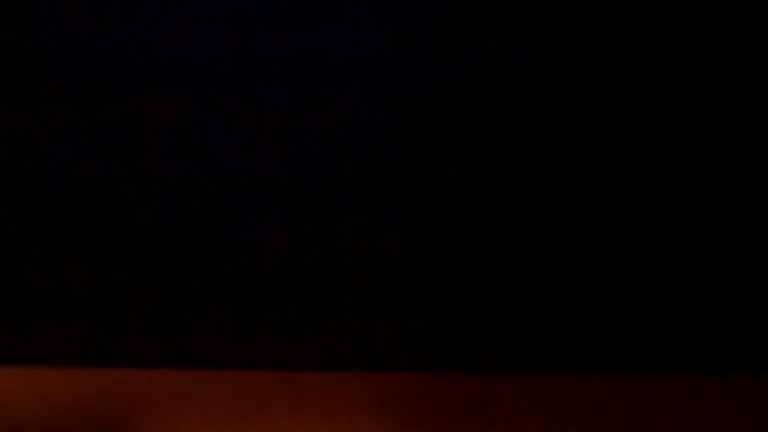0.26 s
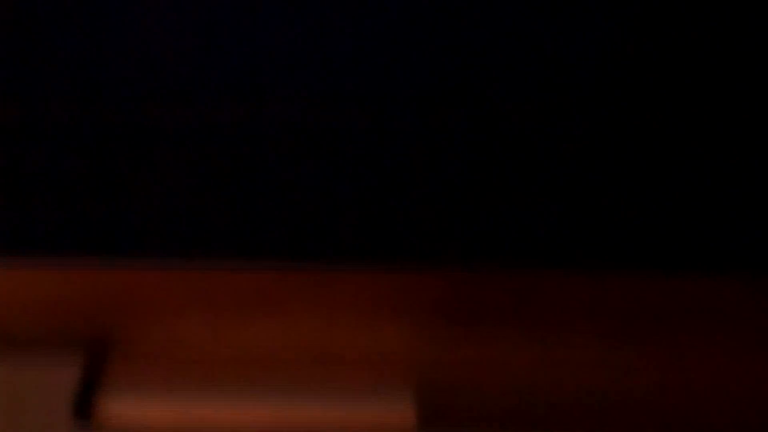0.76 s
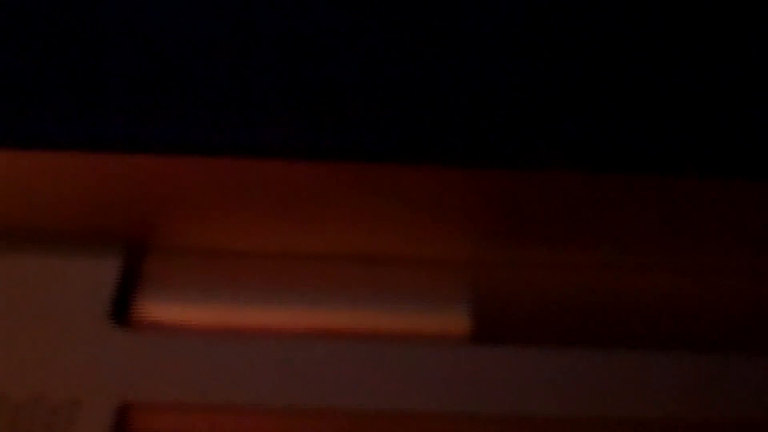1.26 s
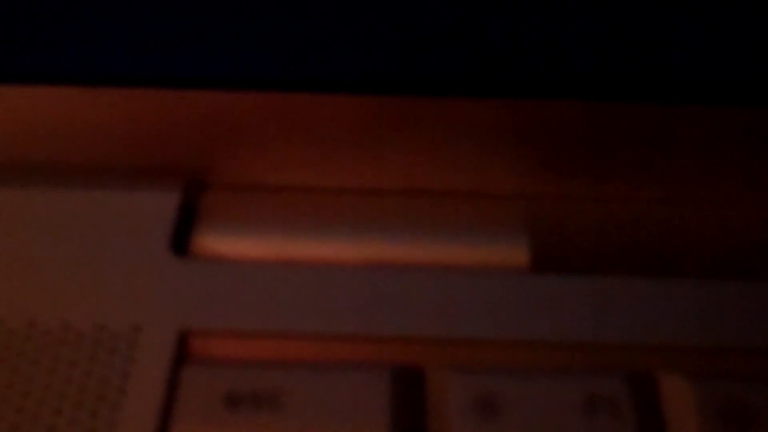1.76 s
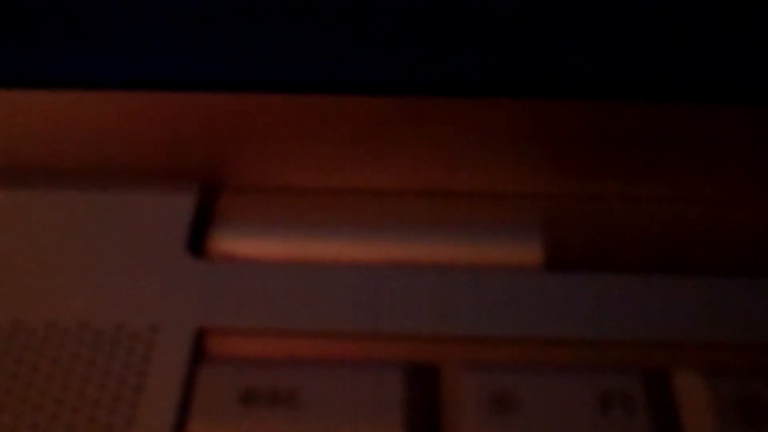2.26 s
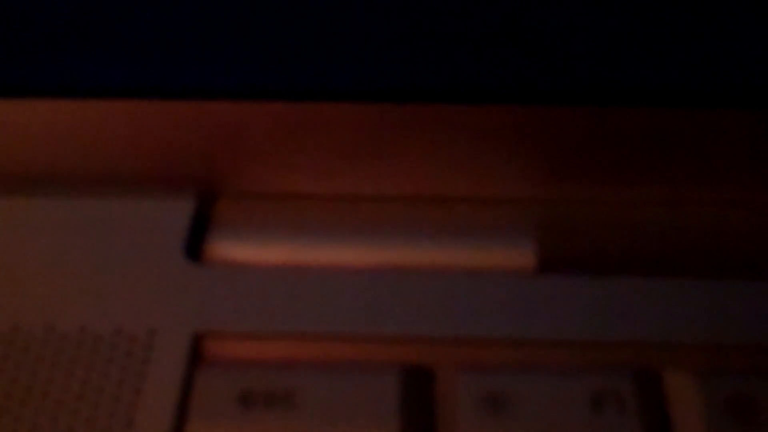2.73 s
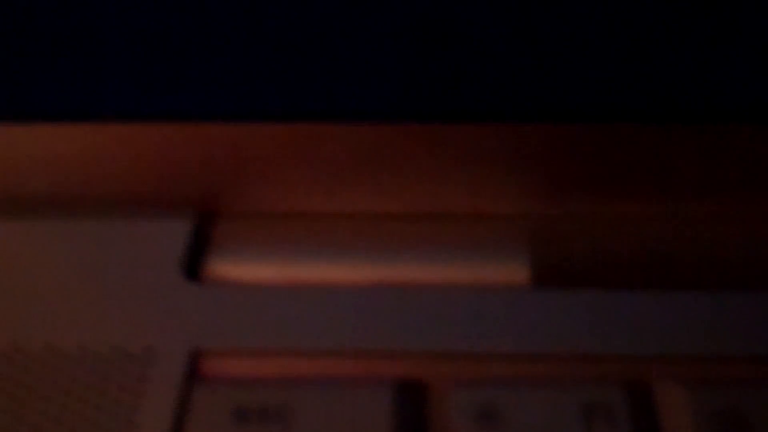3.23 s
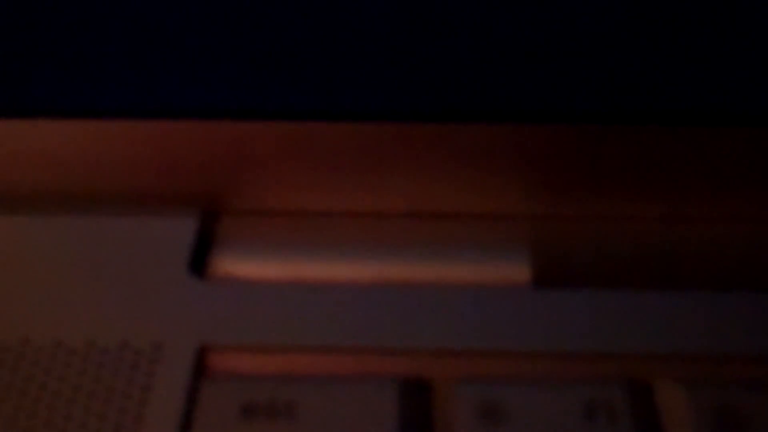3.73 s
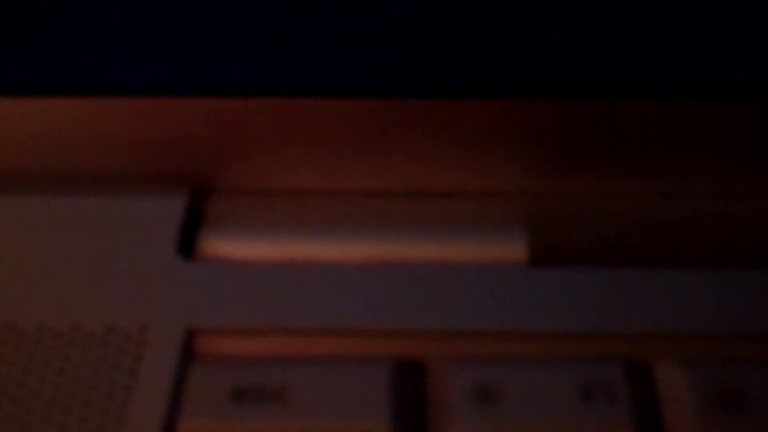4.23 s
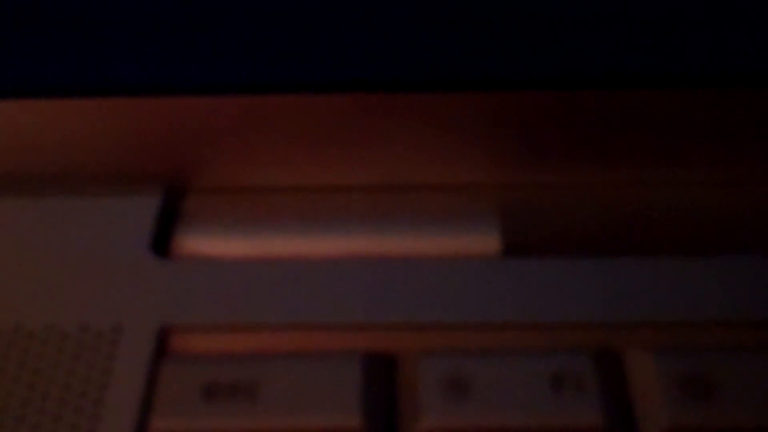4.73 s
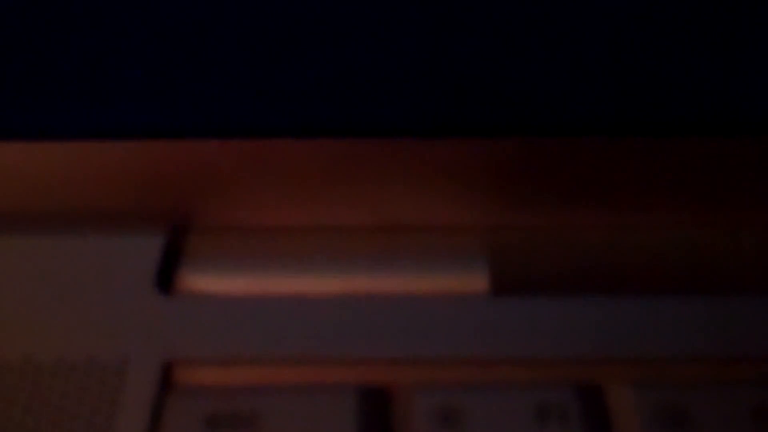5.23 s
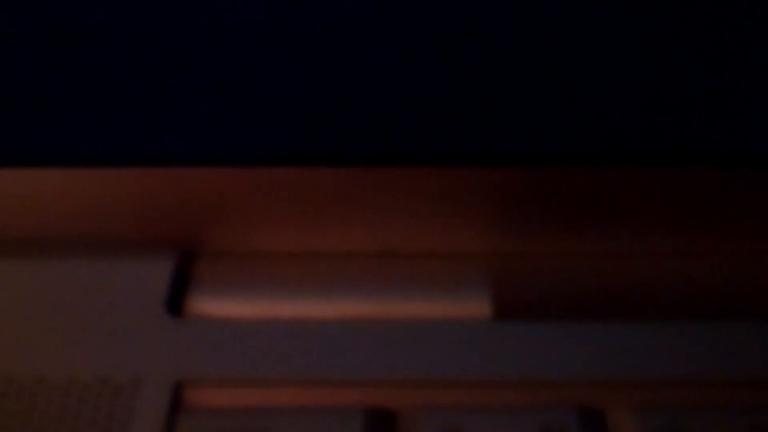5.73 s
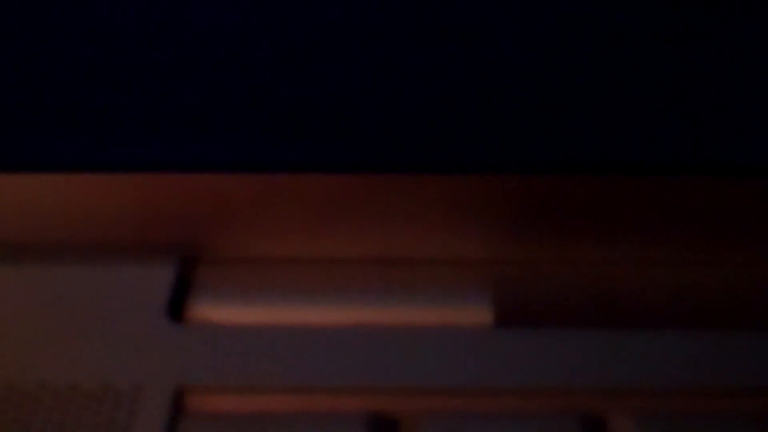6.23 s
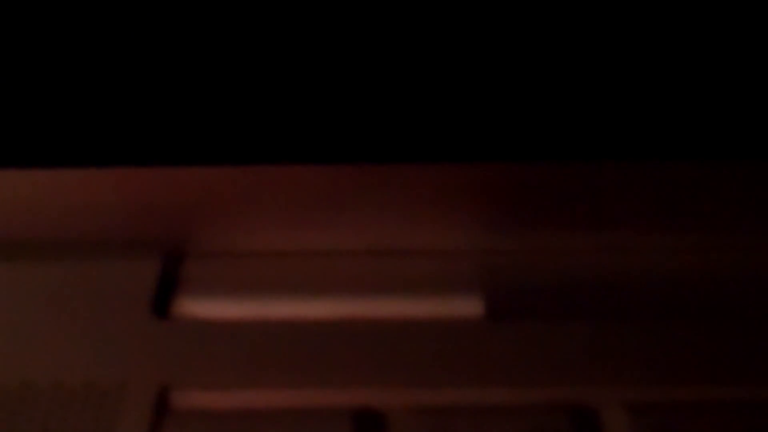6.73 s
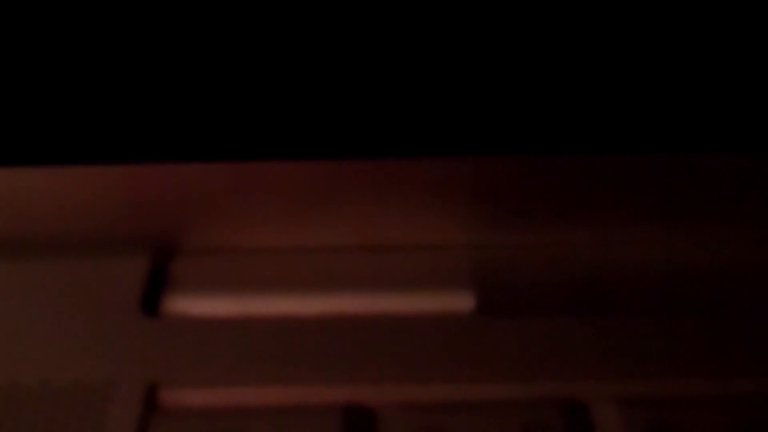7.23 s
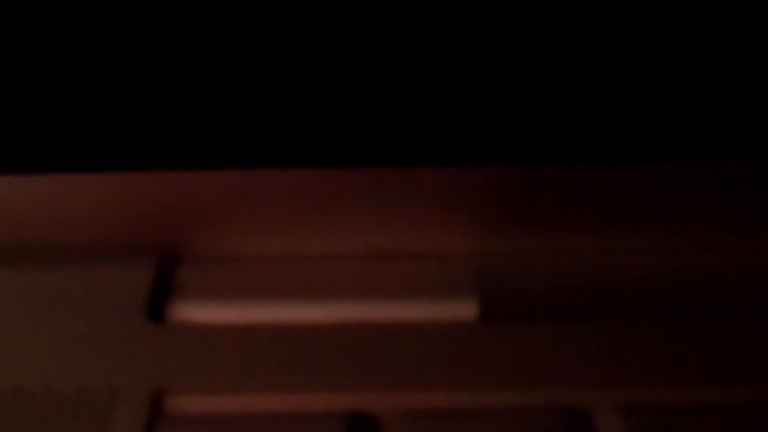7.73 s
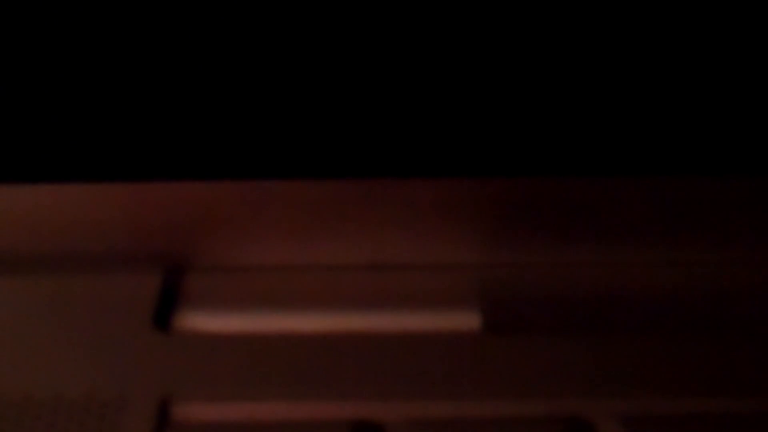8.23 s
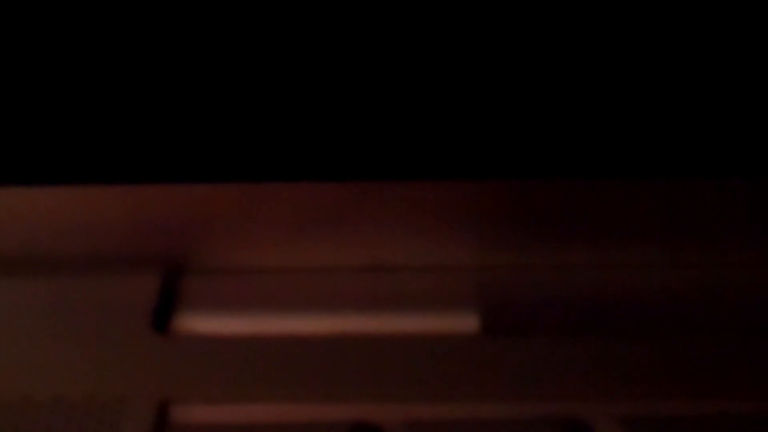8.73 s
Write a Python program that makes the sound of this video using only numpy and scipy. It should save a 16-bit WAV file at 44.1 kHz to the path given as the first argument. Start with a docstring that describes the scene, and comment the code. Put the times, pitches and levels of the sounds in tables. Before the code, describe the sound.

A worn laptop fan whines and rattles steadily up close, then groans, grinds briefly and seizes, leaving a quiet room.

```python
"""A dusty laptop fan with a worn sleeve bearing, close to a stereo microphone on a desk in a still room.
After a brief bright hiss the fan whines over the air from its vent. The shaft whirls in the sleeve a
little faster than the rotor turns; the two motions mix into a cluster of tones and knock the case.
Near 5.7 s the whirl locks to 13 rounds in 11 turns and the whine firms; a faint low drone passes.
Near 8 s the whirl collapses, the rotor groans, catches on the dust and seizes, leaving room tone."""
import sys
import numpy as np
from scipy import signal
from scipy.fft import rfft, irfft
from scipy.io import wavfile
from scipy.ndimage import uniform_filter1d

SR = 44100
rng = np.random.default_rng(int(sys.argv[2]) if len(sys.argv) > 2 else 0)


def store_pcm(level_fs):
    """Save levels as 16-bit WAV."""
    pcm = np.round(np.clip(level_fs, -1, 1) * 32767).astype(np.int16)
    wavfile.write(sys.argv[1], SR, np.atleast_2d(pcm).T)


N = 396018

LOCKED_RATIO = 13 / 11   # whirl rounds per rotor turn
DRAG_S, SEIZE_S, STOP_S = 7.95, 8.212, 8.262   # stages of the stall


def motion(collapse_at_s=7.968, collapse_s=.135, collapsed_ratio=1.025):
    """Rotor turns per second, whirl rounds per turn, and the shares of locking and collapse (0-1)."""
    # Speed that the motor holds: time_s, turns_per_s
    motor_speed = [(0, 177.7), (0.5, 177.4), (1.7, 176.2), (2.5, 176.3), (3, 177.0), (3.75, 177.3),
                   (4.25, 176.8), (5.1, 177.2), (5.72, 178.6), (7.95, 179.3)]
    driven, = in_time(motor_speed)
    lost = 40 * since(DRAG_S) + 300 * since(SEIZE_S)
    turns = np.maximum(driven - lost, driven / 2)
    # the free whirl follows the rotor only in part, so a faster rotor brings it down to the locked ratio
    free_whirl_hz = 210.6 + .4 * (driven - 177.6)
    ratio = np.maximum(free_whirl_hz / driven, LOCKED_RATIO)
    lock = np.interp(driven, [177.0, 179.1], [.15, .99])
    collapse = ease(since(collapse_at_s) / collapse_s)
    return turns, ratio + collapse * (collapsed_ratio - ratio), lock, collapse


def angles(turns, ratio, lock, collapse):
    """Rotor and whirl angles in radians; the whirl slips a little while free, more as it collapses."""
    rotor = 2 * np.pi * np.cumsum(turns) / SR
    whirl = 2 * np.pi * np.cumsum(turns * ratio) / SR
    tug = .05 * np.sin(slow_beat(rotor, whirl)) + blend(.016, .009, lock) * drift(12)
    slip = blend(.045, .012, lock) + .2 * collapse ** 3
    return rotor + tug, whirl + tug + slip * drift(22.5)


def slow_beat(rotor, whirl):
    """Phase of the beat between five rounds of whirl and the six turns they nearly match."""
    return 5 * whirl - 6 * rotor


def bearing(rotor, whirl, lock):
    """Sum and difference tones of the two motions: low hum, shake of the shaft and fluttering whine."""
    # Tones of the bearing, levels relative: rotor_multiple, whirl_multiple, free_db, locked_db
    tones = [(1, 0, -49.3, -49.0), (-1, 2, -60.8, -67), (-3, 4, -65.9, -66.6), (2, 0, -54.8, -53.9),
             (1, 1, -60.0, -60.1), (0, 2, -63.3, -65.3), (1, 2, -48.9, -46.2), (6, -2, -46, -43.5),
             (-1, 4, -40.4, -38.0), (4, 0, -42.0, -44.1), (1, 3, -49.4, -48.9), (-1, 5, -38.7, -38.3),
             (4, 1, -48.1, -45.6), (3, 2, -49.0, -47.0), (1, 4, -48.5, -42.6), (6, 0, -51.0, -50.4),
             (-1, 6, -50.5, -47.8), (4, 2, -46.2, -47.7), (3, 3, -50.8, -47.9), (9, -2, -39.9, -39.7),
             (1, 5, -41.0, -41.8), (7, 0, -51.3, -47.0), (6, 1, -45.6, -49.0), (5, 2, -49.7, -49.5),
             (4, 3, -45.1, -43.4), (3, 4, -51.8, -46.2), (9, -1, -49.2, -44.3), (2, 5, -50.9, -50.3),
             (8, 0, -50.0, -49.0), (1, 6, -49.6, -51.3), (11, -2, -44.5, -40.5), (3, 5, -43.9, -42.7),
             (-4, 11, -48.9, -45.3), (8, 1, -46.8, -51.2), (1, 7, -47.6, -49.6), (7, 2, -48.0, -49.2),
             (0, 8, -49.9, -50.2), (6, 3, -37.3, -37.4), (-1, 9, -51.0, -49.6), (11, -1, -49.3, -47.9),
             (-6, 8, -54, -54), (3, 1, -55, -54), (9, -4, -56, -53), (2, 2, -54, -56), (8, -3, -58, -59),
             (-6, 9, -57, -59), (-6, 10, -55, -54), (-4, 9, -49, -70), (15, -7, -50, -57),
             (12, -4, -53, -51), (-2, 8, -53, -50), (-4, 10, -49, -70), (-7, 13, -55, -50),
             (5, 3, -51, -52), (-2, 9, -49, -70), (9, 0, -50, -70), (15, -5, -56, -50), (12, -2, -49, -49),
             (5, 4, -52, -50), (2, 3, -55, -56), (0, 7, -54, -53), (7, 1, -60, -53), (-1, 8, -60, -52),
             (10, 0, -55, -52), (1, 9, -54, -62), (6, 5, -64, -52), (11, 1, -62, -57), (11, 5, -64, -52),
             (0, 15, -53, -60), (1, 15, -62, -50), (2, 15, -52, -60), (9, 9, -62, -53), (20, 0, -53, -60),
             (19, 1, -51, -47), (0, 17, -53, -68)]
    hum, shake, whine = np.zeros((3, N))
    flutters = [1 + blend(.1, .05, lock) * drift(34) for _ in range(13)]
    for k, (per_turn, per_round, free_db, locked_db) in enumerate(tones):
        phase = per_turn * rotor + per_round * whirl + rng.uniform(0, 2 * np.pi)
        tone = np.sqrt(2) * blend(from_db(free_db), from_db(locked_db), lock) * np.sin(phase)
        order = per_turn + per_round * LOCKED_RATIO
        if order < 3:
            hum += tone
        else:
            shake += tone * (order < 10)   # the highest tones are too small to swing the shaft
            whine += tone * flutters[k % len(flutters)]
    return hum, rms_one(shake), rms_one(evened(whine, .9 * lock ** 2))


def radiated(whine, lowest_mode_hz=575):
    """The case radiates next to nothing below its lowest mode."""
    return signal.sosfilt(signal.ellip(6, .3, 40, lowest_mode_hz, "high", fs=SR, output="sos"), whine)


def evened(x, share, load_s=.018):
    """The load on the sleeve is steady, so strong and weak moments even out."""
    span = int(load_s * SR)
    power = uniform_filter1d(uniform_filter1d(x ** 2, span), span // 2)
    return x * (np.abs(power) / power.mean() + 1e-3) ** (-share / 2)


def knocks(shake, rotor, whirl, clearance=.11, uneven_db=.7):
    """The shaft hits the sleeve at each swing past the clearance, harder the further it would go."""
    before, here, after = shake[:-2], shake[1:-1], shake[2:]
    at = np.flatnonzero((here > before) & (here >= after) & (here > clearance))
    chance_db = uneven_db * rng.standard_normal(N)
    force = np.sqrt(here[at] - clearance) * grip(rotor[at], whirl[at]) * from_db(chance_db[at])
    # each peak falls between two samples, which share its click
    peak = at + 1 + .5 * (before[at] - after[at]) / (before[at] - 2 * here[at] + after[at])
    first, late = peak.astype(int), peak % 1
    return np.bincount(first, force * (1 - late), N) + np.bincount(first + 1, force * late, N)


def grip(rotor, whirl, graze_db=-4, spread_laps=.085, spread_turns=.16):
    """The shaft touches hardest where rotor and whirl bring it onto a worn place."""
    # Worn places where the shaft rubs: position_laps, position_turns, gain_db
    worn_places = [(.84, .40, -2), (.95, .40, -2), (.60, .74, 0), (.43, .88, -4), (.90, .74, -1),
                   (.40, .25, -6), (.17, .15, -7)]
    turn, lap = rotor / (2 * np.pi), (whirl - rotor) / (2 * np.pi)
    gain = from_db(graze_db)
    for at_lap, at_turn, db in worn_places:
        laps_away = (lap - at_lap + .5) % 1 - .5
        turns_away = (turn - at_turn + .5) % 1 - .5
        away = (laps_away / spread_laps) ** 2 + (turns_away / spread_turns) ** 2
        gain = gain + from_db(db) * np.exp(-away / 2)
    # an oval shaft in an oval sleeve presses twice a turn and twice a round
    return gain * (1 + .33 * np.cos(2 * rotor)) * (1 + .36 * np.cos(2 * whirl))


def case_ring(clicks, lock):
    """The case and its thin parts ring at each knock; scaled to unit power in the treble."""
    # How the case answers a knock: frequency_hz, gain_db
    case_response = [(200, -38), (540, -8), (610, -14.5), (1200, -27), (1730, -7.5), (1860, -3.5),
                     (2100, -1), (2650, -7.5), (2950, 2.5), (3620, 0), (3800, -3), (4250, -4), (5000, -4),
                     (5600, -8.5), (6800, -26.5), (8000, -17.5), (10000, -32.5)]
    # Thin parts that ring: pitch_hz, width_hz, free_db, locked_db
    thin_parts = [(1740, 350, 8, -6), (2000, 100, -7, -1), (2560, 23, -1, -2), (3604, 82, 7, 8),
                  (4590, 220, 4, -8)]
    case = colour(dispersed(clicks), case_response)
    parts = sum(blend(from_db(free_db), from_db(locked_db), lock) * ring(case, hz, width)
                for hz, width, free_db, locked_db in thin_parts)
    rung = evened(case + parts, blend(.15, 1, lock))
    treble = signal.sosfilt(signal.butter(2, [2800, 6000], "band", fs=SR, output="sos"), rung)
    return rung / np.std(treble)


def dispersed(x, centres_hz=(1200, 1700, 2200, 2900, 3150, 3400), width_hz=520):
    """Bending waves in the thin case smear each knock over a millisecond or two (allpass sections)."""
    r = np.exp(-np.pi * width_hz / SR)
    for hz in centres_hz:
        poles = [1, -2 * r * np.cos(2 * np.pi * hz / SR), r * r]
        x = signal.lfilter(poles[::-1], poles, x)
    return x


def rasp(rotor, whirl, lock):
    """Gain of the knocks, pulsing with the slow beat, more deeply once the whirl locks."""
    beat = slow_beat(rotor, whirl)
    return from_db(.9 * (lock + .5) * (np.sin(beat) - .5 * np.cos(2 * beat)))


def bright_edge(rattle, rotor, whirl, lock, settle_s=.32, flutter=.38):
    """The rattle sounds brighter for a first moment; a free whirl flutters it twice per slow beat."""
    # Bands lifted at the start: centre_hz, width_hz, added_db
    early_bands = [(1710, 84, 15.5), (3260, 280, 4.5), (4500, 300, -7), (5050, 420, 8.5)]
    early = sum(from_db(db) * ring(rattle, hz, width) for hz, width, db in early_bands)
    flicker = -flutter * (1 - lock) * np.cos(2 * slow_beat(rotor, whirl))
    return rattle + flicker * ring(rattle, hz=4680, width_hz=750) + np.exp(-since(0) / settle_s) * early


def groan(rotor, collapse, flutter=.49):
    """As the whirl dies, plain rotor orders take over; each swells falling through a case resonance."""
    # Case resonances and the orders that excite them: rotor_order, pitch_hz, width_hz, level_db
    resonances = [(2, 340, 33, -52.5), (4, 680, 82, -38.5), (7, 1185, 16, -51), (9, 1553, 13, -46)]
    tone = sum(from_db(db) * ring(collapse * np.sin(order * rotor), hz, width)
               for order, hz, width, db in resonances)
    return np.sqrt(2) * tone * (1 + flutter * drift(44))


def grind(rotor, grains_per_s=1800):
    """The slowing rotor catches on the dusty sleeve in bursts of gritty slips, pulsing once a turn."""
    # Catches of the rotor: peak_s, half_length_s, level_db
    catches = [(8.05, .025, -42), (8.087, 0.027, -40), (8.139, 0.018, -35.5), (8.169, .01, -35),
               (8.218, 0.011, -35.5), (8.248, .003, -39)]
    # Colour of the scraping: frequency_hz, gain_db
    grit_spectrum = [(480, -27), (640, -5), (850, 0), (1650, 6), (1900, -5), (2600, -23), (3000, 0),
                     (3400, 2), (3750, -9), (5200, -6), (6500, -28)]
    slips = rng.random(N) < grains_per_s / SR
    grains = slips * rng.standard_normal(N) * (1 + .5 * np.cos(rotor))
    level = sum(from_db(db) * swell(s, length, length) for s, length, db in catches)
    return level * rms_one(colour(grains, grit_spectrum))


def fan(rotor, whirl, lock, collapse, running, desk_db=-14):
    """Hum, whine, rattle and groan together, with the rattle reflected around the desk."""
    # How hard the shaft bears on the sleeve, levels relative: time_s, whine_db, knock_db
    effort = [(0, -30.5, -42.5), (1.4, -29, -39.5), (5, -27.5, -39), (5.75, -28, -40), (7.95, -28.5, -40.5)]
    whine_db, knock_db = in_time(effort)
    hum, shake, whine = bearing(rotor, whirl, lock)
    # the hum of the unbalanced rotor starts low, settles, and dies once the rotor drags
    hum = hum * from_db(-3.5 * np.exp(-since(0) / .88) - 45 * since(DRAG_S))
    whine = from_db(whine_db - 8.5 * collapse) * radiated(whine)
    force = running * from_db(knock_db + 2.5 - 5 * collapse) * rasp(rotor, whirl, lock)
    knocking = force * case_ring(knocks(shake, rotor, whirl), lock)
    rattle = bright_edge(knocking, rotor, whirl, lock) + grind(rotor)
    tonal = running * (hum + whine + groan(rotor, collapse))
    return tonal + rattle + from_db(desk_db) * scattered(rattle, t60_s=.2)


def scattered(x, t60_s, size=8192):
    """Dense short reflections from screen, keyboard and desk."""
    tail = rng.standard_normal(size) * from_db(-60 * np.arange(size) / SR / t60_s)
    return signal.fftconvolve(x, tail / np.linalg.norm(tail))[:N]


def microphone_ports(x):
    """Each port hears its own colour; the treble reaches the left later and arrives partly scattered."""
    # Balance between the ports: frequency_hz, left_minus_right_db
    balance = [(100, 0), (180, -3.5), (500, -1.5), (760, -1.5), (1170, .7), (1680, 2.5), (1900, -2),
               (2500, 1.5), (2950, -3.5), (3300, -.6), (4050, .5), (4450, -6), (4850, -4), (5200, -8),
               (6500, 0), (7900, 9), (9000, 0)]
    # Delay at the left port: frequency_hz, lag_rad
    left_lag = [(3900, 0), (4300, .8), (5000, 1.2), (6200, 1.9)]
    # Share that arrives scattered: frequency_hz, gain_db
    scatter_spectrum = [(150, -35), (700, -19), (1600, -17), (1850, -10), (2200, -26), (3650, -23),
                        (4150, -5), (4650, -12), (6000, -5), (9000, -2)]
    side = colour(scattered(x, t60_s=.05), scatter_spectrum)
    lean = from_db(in_frequency(balance, N) / 2) * np.exp(-.5j * in_frequency(left_lag, N))
    spectrum = rfft(x)
    return np.array([irfft(spectrum * lean, N) + side, irfft(spectrum / lean, N) - side])


def vent_air(collapse, hiss_db=-47.5, rumble_db=-57.5, collapse_db=-4):
    """Hiss and rumble at the vent, weaker as the fan fails, with a few soft rustles on top."""
    # Hiss of the air stream: frequency_hz, density_db
    hiss_spectrum = [(1000, -2.5), (3000, 14), (4500, 9), (6000, 8.5), (8500, 3), (10000, -7.5),
                     (12000, -2), (14200, 1)]
    # Rumble of the air stream: frequency_hz, density_db
    rumble_spectrum = [(20, -20), (75, -16), (110, -9), (150, -2), (300, 1), (500, 2), (800, -3),
                       (2000, -43)]
    # Soft rustles: peak_s, half_length_s, low_db, high_db
    rustles = [(.8, 0.22, -53, -60), (1.652, 0.18, -56, -54), (3.216, .07, -55, -50),
               (3.907, 0.13, -56, -51), (6.472, 0.17, -55, -54), (6.8, 0.25, -56, -63)]
    hiss_power = from_db(hiss_db) ** 2
    rumble_power = from_db(rumble_db - .9 * drift(2.1)) ** 2
    for s, length, low_db, high_db in rustles:
        shape = swell(s, length, length)
        hiss_power += (from_db(high_db) * shape) ** 2
        rumble_power += (from_db(low_db) * shape) ** 2
    hiss = np.sqrt(hiss_power) * stereo_noise(hiss_spectrum, alike=.21)
    rumble = np.sqrt(rumble_power) * stereo_noise(rumble_spectrum, alike=.68)
    return from_db(collapse_db * collapse) * (hiss + rumble)


def bright_hiss(level_db=-35):
    """A short bright hiss at the outset, wide across the microphone."""
    # Colour of the hiss: frequency_hz, density_db
    spectrum = [(2800, -43), (3400, -15), (5000, -10), (6400, -3), (7300, 3), (9300, 2), (11000, -8),
                (14000, -10)]
    shape = swell(peak_s=.055, attack_s=.08, release_s=.042)
    return from_db(level_db) * shape * stereo_noise(spectrum, alike=.28)


def room_tone(still_db=-55.5, mains_db=-70.5, mains_hz=118.4, drone_db=-63.5, drone_hz=100):
    """The still room, a faint wavering mains hum and a passing low drone."""
    # Noise of the still room: frequency_hz, density_db
    still_spectrum = [(25, -10), (60, -11), (85, -14), (120, -16), (200, -4), (290, -6), (500, -9.5),
                      (1000, -12), (2000, -16.5), (5000, -15), (10000, -16.5), (14000, -11)]
    band = ring(rng.standard_normal(N), drone_hz, width_hz=25)
    band = rms_one(ring(band, drone_hz, width_hz=25))
    drone = from_db(drone_db) * swell(peak_s=6.6, attack_s=.11, release_s=.45) * band
    mains = from_db(mains_db + 4 * drift(1.9)) * np.sin(2 * np.pi * mains_hz * since(0))
    return from_db(still_db) * stereo_noise(still_spectrum, alike=.044) + mains + drone


def stereo_noise(spectrum, alike):
    """Coloured noise with correlation `alike` between the ports; the shared part has rms 1."""
    mid, side = (rms_one(colour(rng.standard_normal(N), spectrum)) for _ in range(2))
    return mid + np.sqrt((1 - alike) / (1 + alike)) * side * [[1], [-1]]


def colour(x, spectrum, size=4096):
    """Causal (minimum-phase) filter that follows rows of frequency_hz, gain_db."""
    cepstrum = irfft(np.log(from_db(in_frequency(spectrum, size))))
    cepstrum[1:size // 2] *= 2
    cepstrum[size // 2 + 1:] = 0
    return signal.fftconvolve(x, irfft(np.exp(rfft(cepstrum))))[:N]


def ring(x, hz, width_hz):
    """A resonant band-pass with gain 1 at its peak."""
    r = np.exp(-np.pi * width_hz / SR)
    poles = [1, -2 * r * np.cos(2 * np.pi * hz / SR), r * r]
    return signal.lfilter((1 - r * r) / 2 * np.array([1, 0, -1]), poles, x)


def drift(rate_hz):
    """Slow random wander with rms 1."""
    r = np.exp(-40 * np.pi * rate_hz / SR)   # one step every 20 samples
    slow = signal.lfilter([1], [1, -2 * r, r * r], rng.standard_normal(N // 20 + 2002))[2000:]
    return np.interp(np.arange(N) / 20, np.arange(len(slow)), rms_one(slow))


def in_time(rows):
    """Each column of a curve over time, sample by sample."""
    s, *columns = np.transpose(rows)
    return [np.interp(since(0), s, column) for column in columns]


def in_frequency(rows, size):
    """A curve over log frequency, at each bin of an FFT of this size."""
    hz, values = np.transpose(rows)
    bins_hz = np.maximum(np.fft.rfftfreq(size, 1 / SR), 1)
    return np.interp(np.log(bins_hz), np.log(hz), values)


def swell(peak_s, attack_s, release_s):
    """A bell-shaped gain with its own rise and fall."""
    t = since(0) - peak_s
    return np.exp(-np.minimum((t / np.where(t < 0, attack_s, release_s)) ** 2, 20))


def blend(free, locked, lock):
    """Go from the value with a free whirl to the value with a locked one."""
    return free + lock * (locked - free)


def since(s):
    """Seconds gone by after a moment; zero before it."""
    return np.maximum(np.arange(N) / SR - s, 0)


def ease(x):
    """A smooth step from 0 to 1."""
    return .5 - .5 * np.cos(np.pi * np.clip(x, 0, 1))


def from_db(db):
    """Decibels to gain."""
    return 10 ** (np.asarray(db) / 20)


def rms_one(x):
    """Scale to unit power."""
    return x / np.sqrt(np.mean(x ** 2) + 1e-20)


def scene(fade_s=.069):
    """The fan and its air close to the microphone until the stall, the still room behind."""
    turns, ratio, lock, collapse = motion()
    rotor, whirl = angles(turns, ratio, lock, collapse)
    running = 1 - ease(since(STOP_S - fade_s) / fade_s)
    close_fan = microphone_ports(fan(rotor, whirl, lock, collapse, running))
    return close_fan + running * vent_air(collapse) + bright_hiss() + room_tone()


def record(dry):
    """The top is cut steeply above 14.3 kHz."""
    return signal.sosfilt(signal.ellip(12, .1, 80, 14300, fs=SR, output="sos"), dry)


dry = scene()
out = record(dry)
store_pcm(out)
```